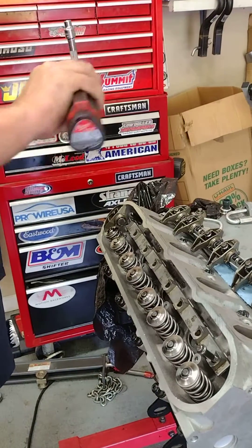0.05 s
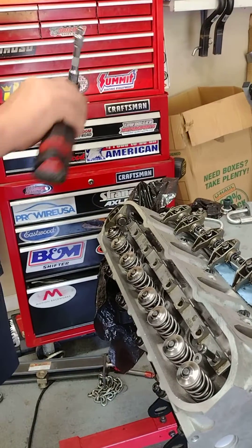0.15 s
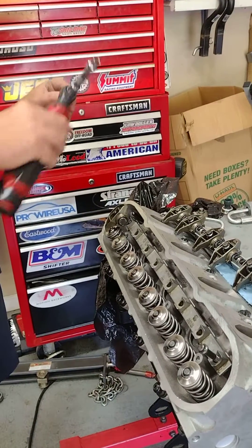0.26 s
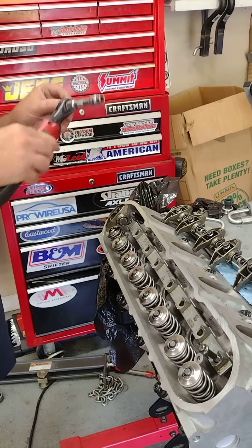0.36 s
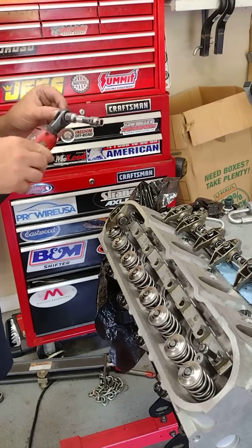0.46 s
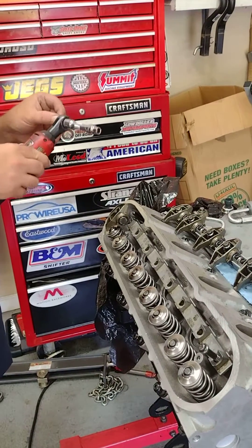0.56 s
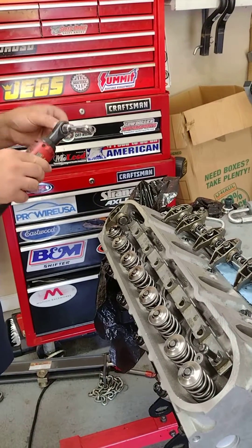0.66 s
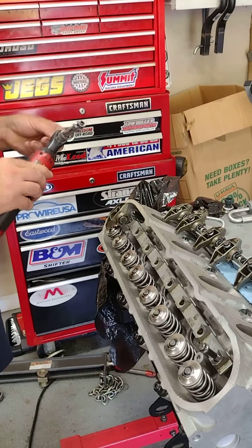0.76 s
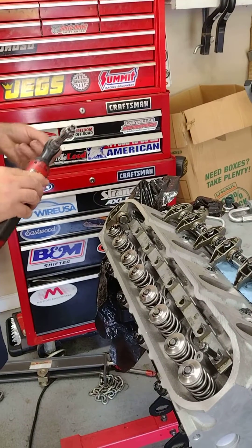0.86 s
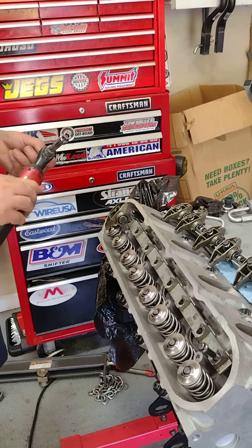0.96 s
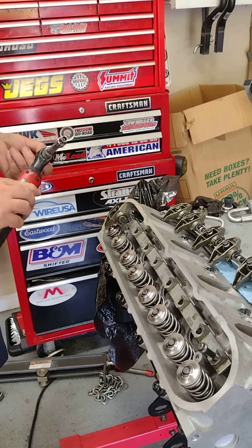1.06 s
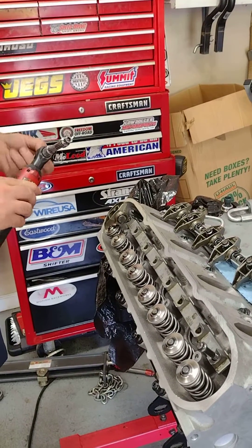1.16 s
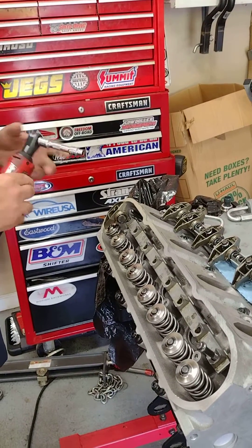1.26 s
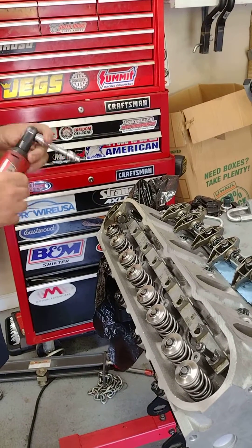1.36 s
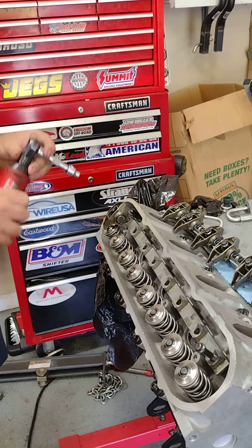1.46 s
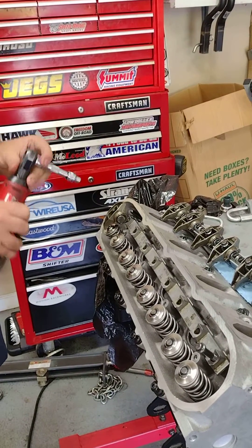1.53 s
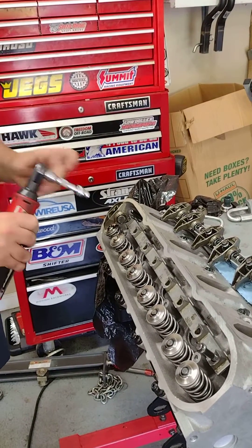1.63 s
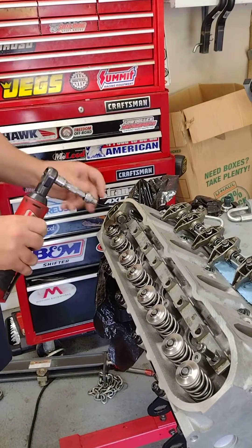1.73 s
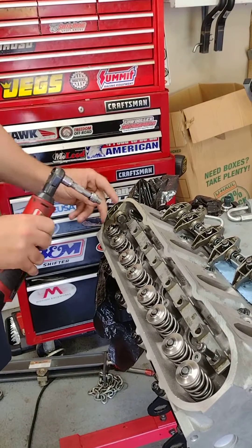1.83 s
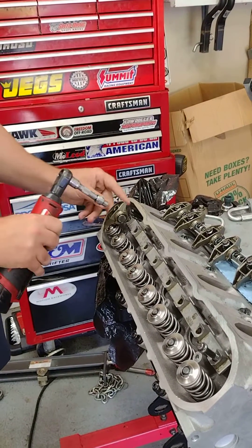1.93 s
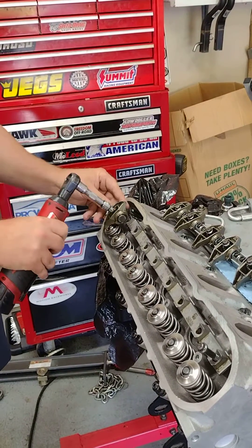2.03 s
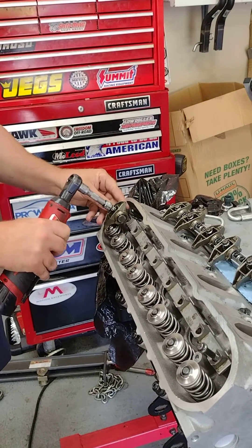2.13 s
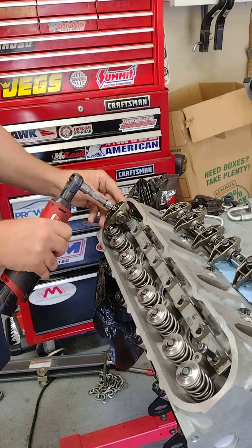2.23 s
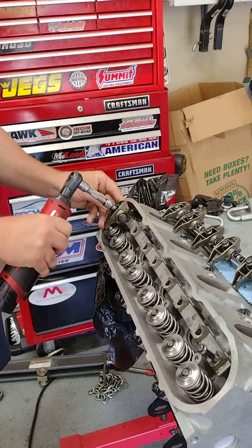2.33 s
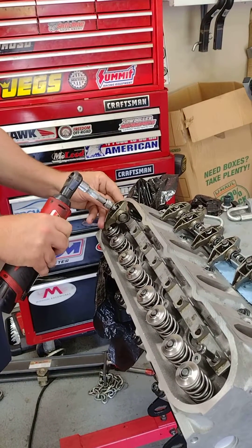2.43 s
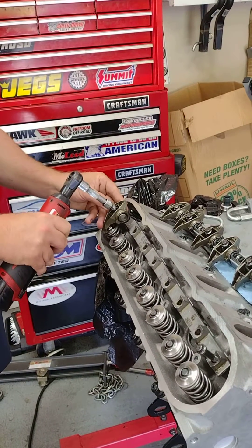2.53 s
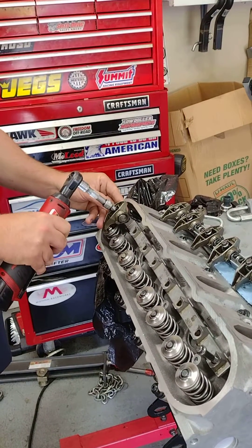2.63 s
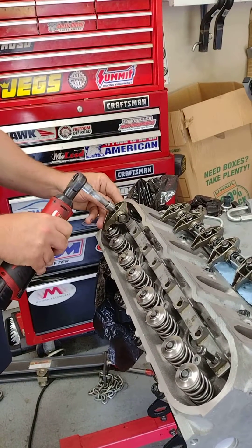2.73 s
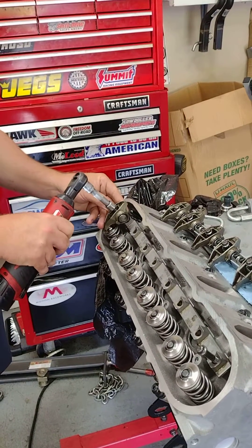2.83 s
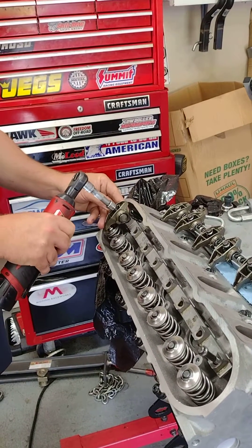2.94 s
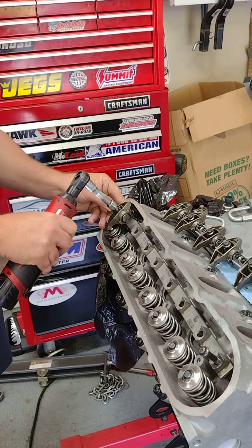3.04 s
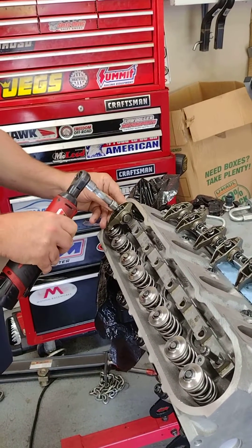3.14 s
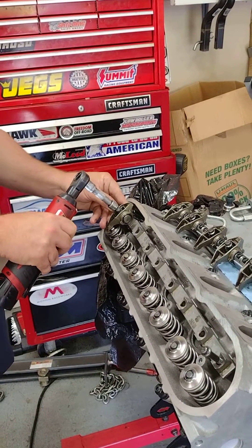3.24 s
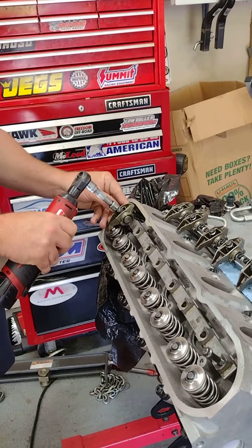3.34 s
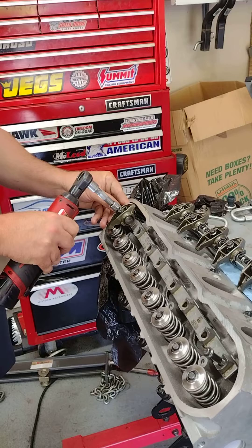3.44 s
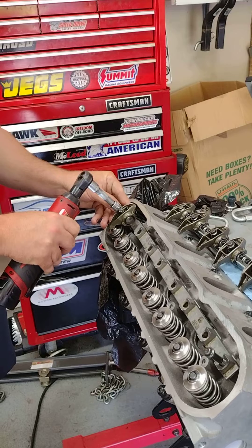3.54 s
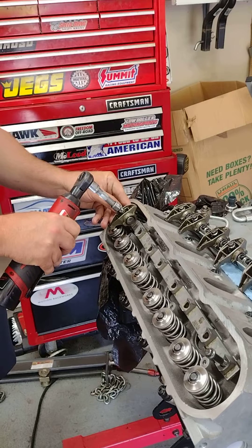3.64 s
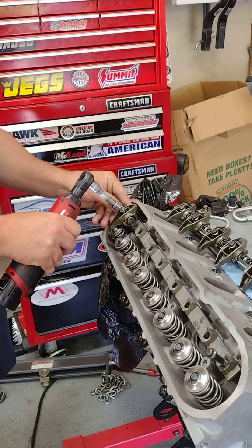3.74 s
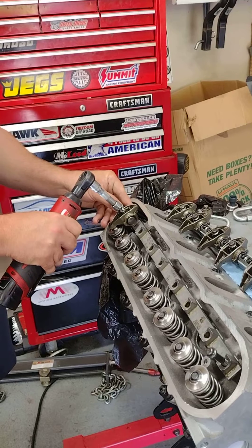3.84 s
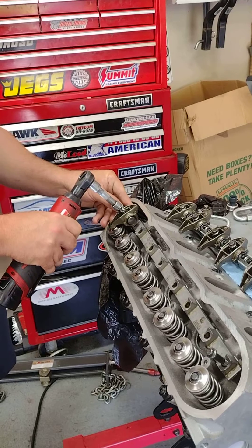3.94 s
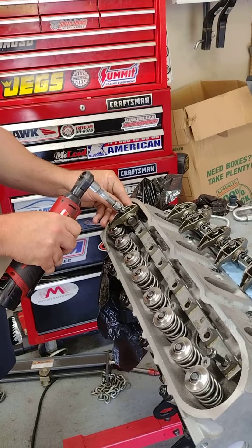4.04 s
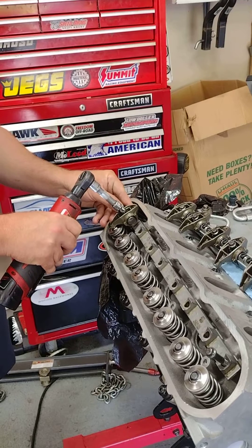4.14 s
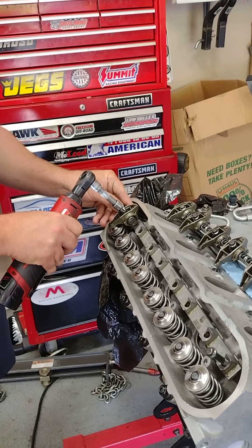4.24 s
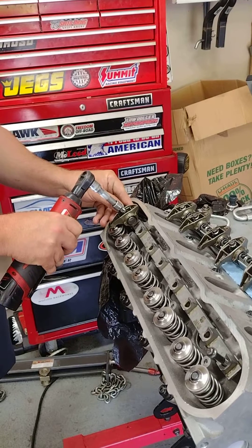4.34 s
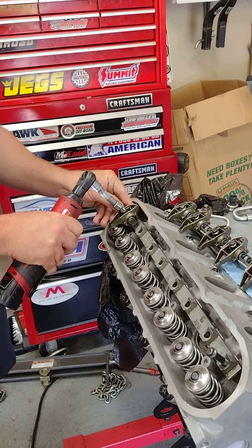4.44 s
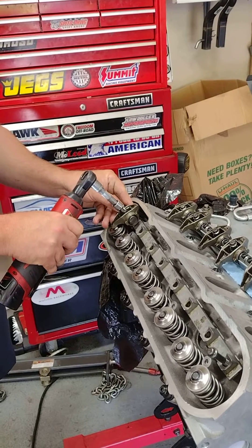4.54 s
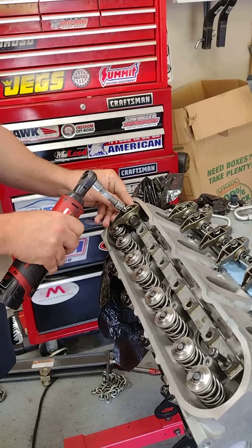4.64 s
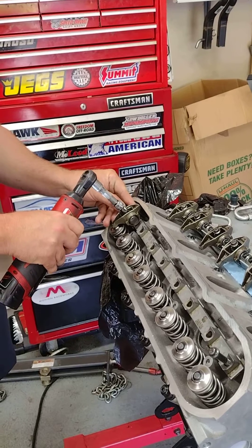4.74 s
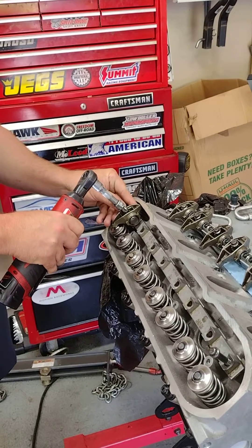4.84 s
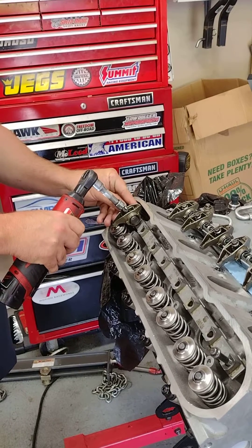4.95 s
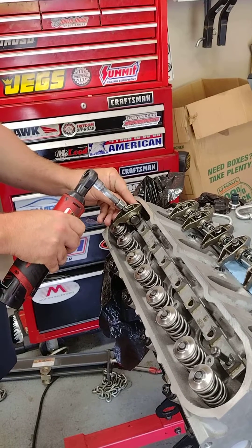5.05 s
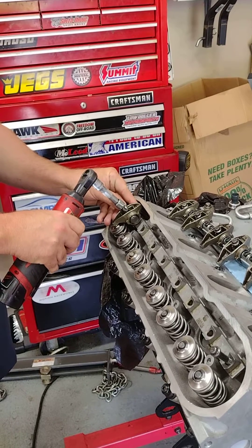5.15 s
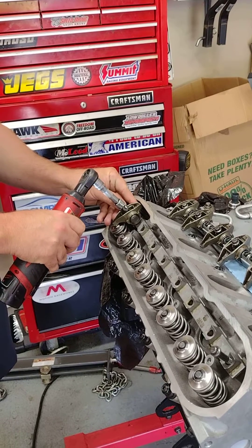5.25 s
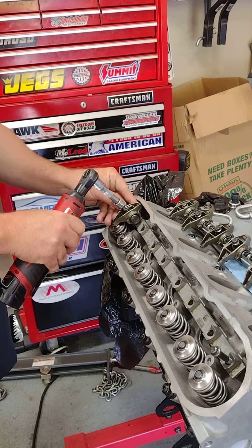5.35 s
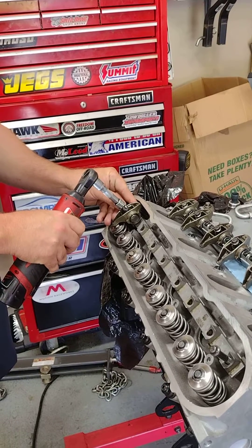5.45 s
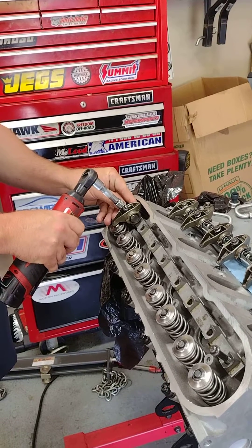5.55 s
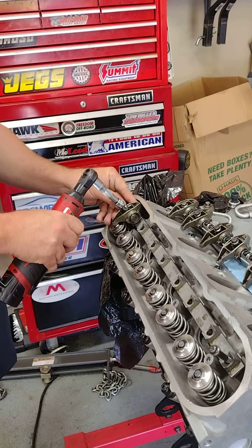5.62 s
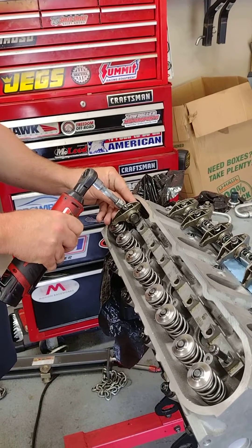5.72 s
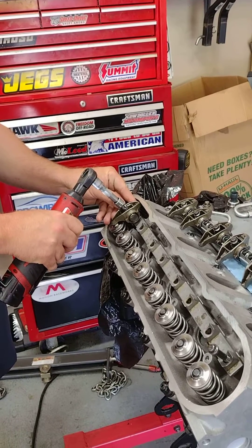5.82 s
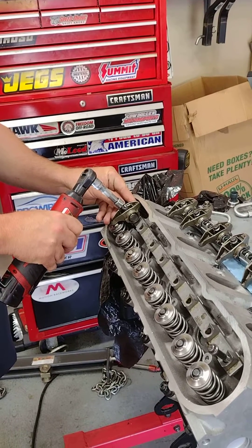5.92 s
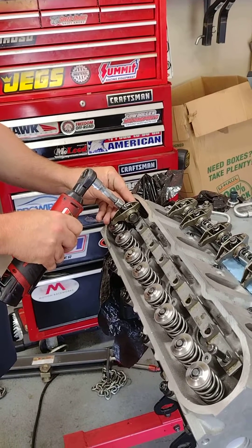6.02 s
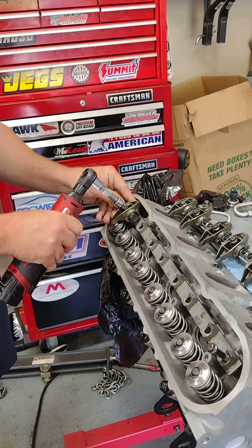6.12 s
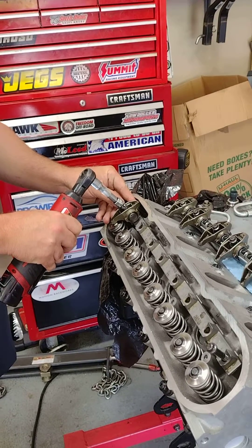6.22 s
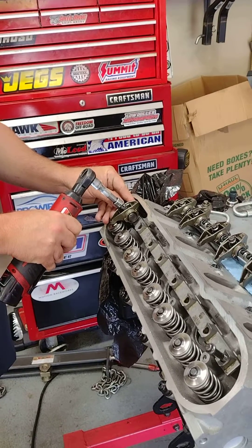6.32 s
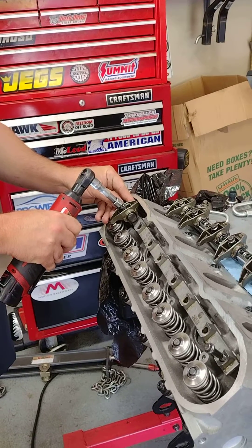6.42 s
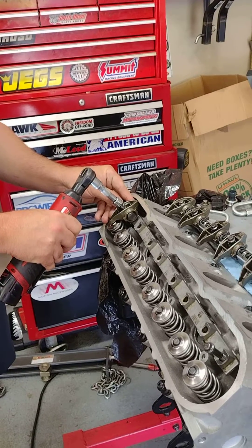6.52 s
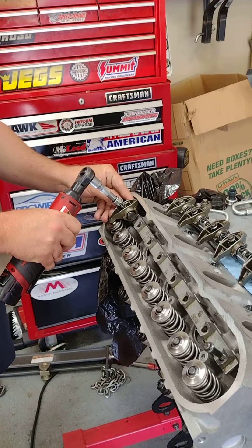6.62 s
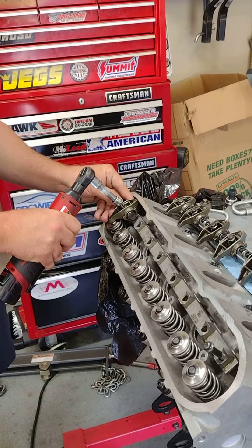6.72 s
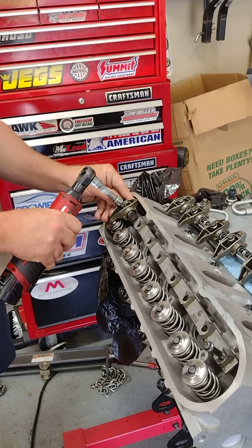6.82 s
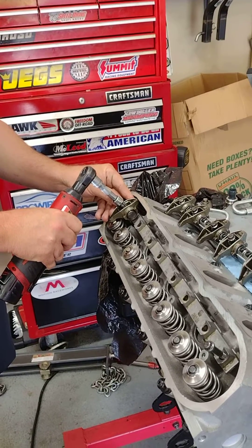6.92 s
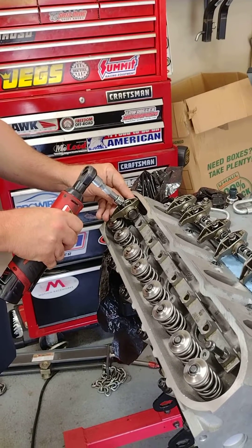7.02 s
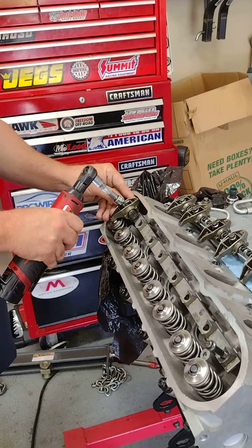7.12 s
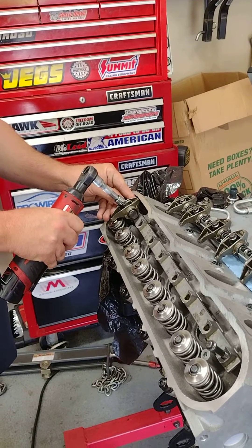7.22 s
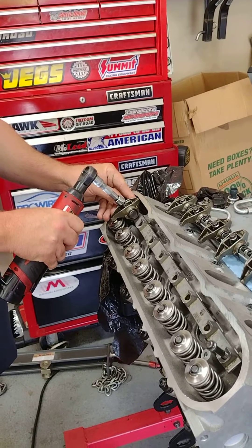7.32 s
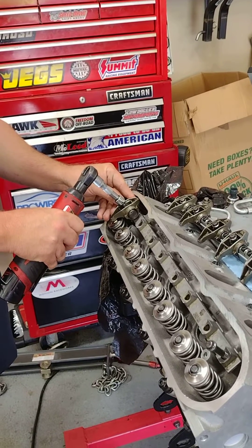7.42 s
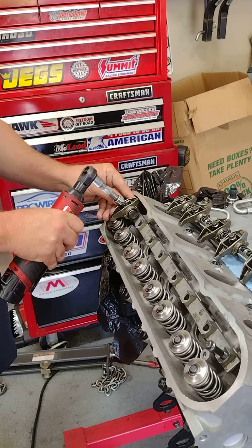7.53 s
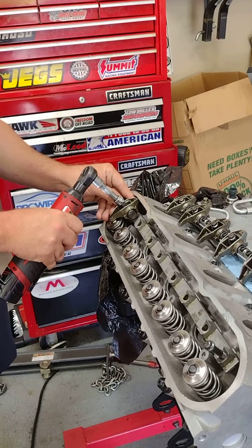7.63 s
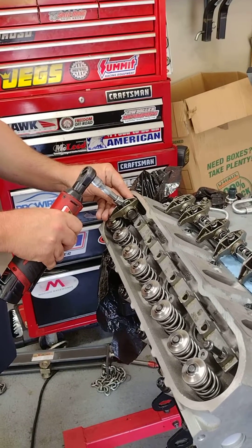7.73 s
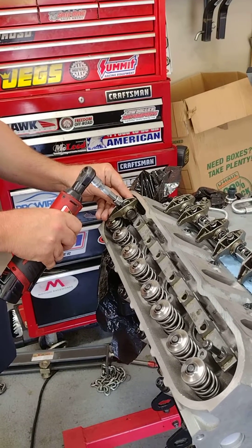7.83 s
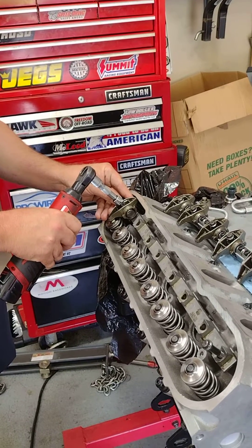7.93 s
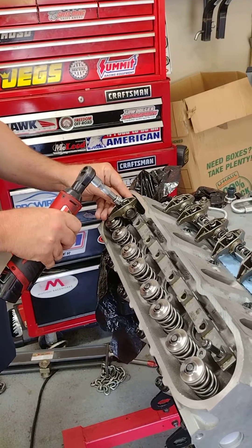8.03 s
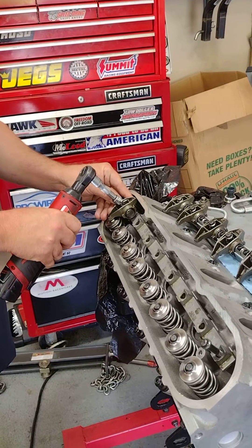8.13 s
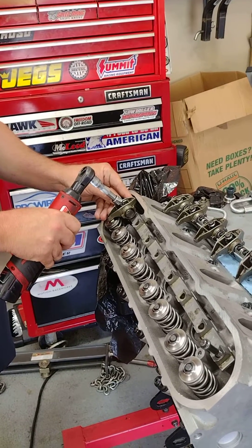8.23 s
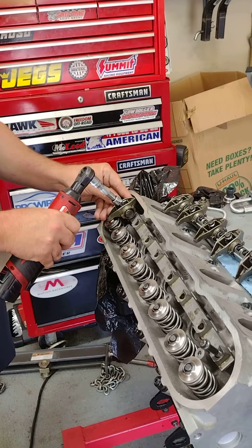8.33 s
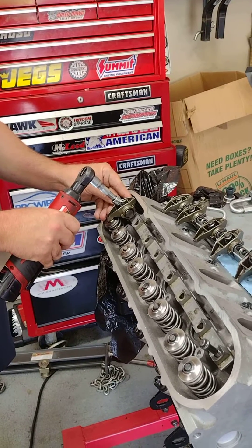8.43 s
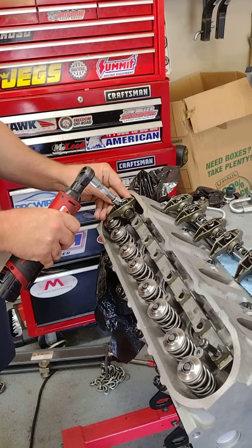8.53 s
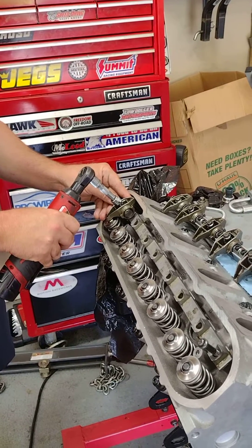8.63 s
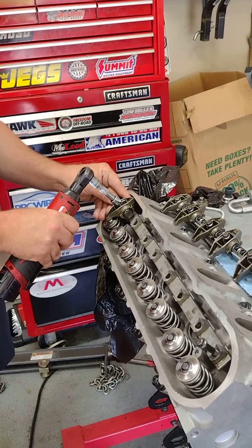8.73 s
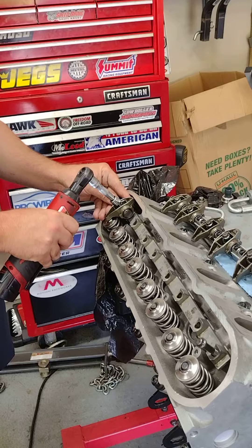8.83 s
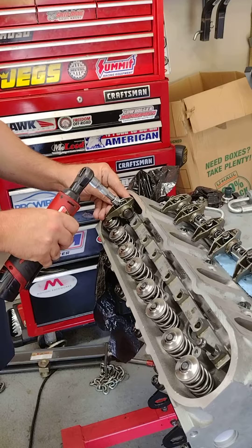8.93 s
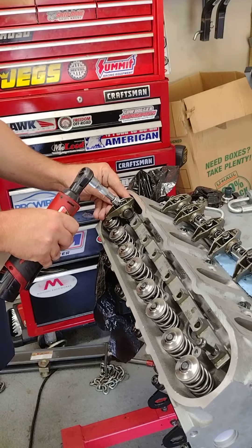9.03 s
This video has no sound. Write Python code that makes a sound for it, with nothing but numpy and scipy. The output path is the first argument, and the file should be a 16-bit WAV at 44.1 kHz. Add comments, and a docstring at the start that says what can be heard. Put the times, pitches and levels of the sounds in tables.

```python
"""A garage, close to a phone: hands turn a cordless ratchet over and seat its socket on a bolt in a cast engine head.
Then the motor runs: a crank rocks the yoke, the pawl skips over teeth, the yoke knocks at both ends of its swing
and the gears grind. Contacts are short pushes into resonances; grind, slides and air are coloured noise; the whine
and the far engine that swells towards the end are sines. The room hums faintly, and more while the tool runs."""
import sys
import numpy as np
from scipy import signal
from scipy.fft import rfft, irfft, next_fast_len
from scipy.io import wavfile
from scipy.ndimage import map_coordinates

SR = 44100
rng = np.random.default_rng(int(sys.argv[2]) if len(sys.argv) > 2 else 0)


def transcribe(signal):
    """Save signal, clipped to [-1, 1], as a 16-bit WAV file at the path in sys.argv[1]."""
    frames = np.atleast_2d(signal).T
    limited = np.clip(frames, -1, 1)
    pcm = np.round(limited * 32767).astype(np.int16)
    wavfile.write(sys.argv[1], SR, pcm)


def invert_db(x):
    """Field ratio 10**(x/20) for x, a level in decibels (scalar or array-like)."""
    u = np.asarray(x, float) / 20
    return 10 ** u


N = 399987
TIME = np.arange(N) / SR  # s

# crank speed: [t/s, speed/turns per s]
CRANK = [(2.7, 18.76), (2.77, 34.5), (2.86, 45.75), (3.05, 43.35), (3.37, 43.16), (3.81, 38.87),
         (4.2, 38.27), (4.46, 27.64), (4.67, 24.64), (5.09, 22.94), (5.69, 22.83), (5.89, 33.15),
         (6.06, 35.33), (6.37, 44.32), (6.86, 46.0), (7.42, 43.9), (7.85, 39.7), (9.07, 38.95)]
# one crank turn, pawl dropping over teeth on the back swing:
# [share of turn, relative level/dB, place ahead on the wheel/crank turns, scatter/turns]
TEETH = [(.065, 9, 0, .01), (.205, 10, -1, .01), (.34, -1, -1, .025), (.445, 1, -1, .02)]
# resonances of pawl, tool housing, light tick and engine casting: [f/Hz, width/Hz, relative level/dB]
PAWL = [(12620, 2170, -9), (16000, 470, -18)]
HOUSING = [(700, 43, -11), (1060, 85, -16), (2010, 360, 1.5), (2560, 420, 3), (3367, 680, 6),
           (5790, 1230, 1)]
TICK = [(1900, 890, -4.5), (3300, 1320, 2.5), (6150, 2200, -2), (11000, 1200, -12)]
CASTING = [(306, 65, -4), (433.3, 19, 7.5), (561, 13, 6.5), (680, 200, -3.5), (1020, 50, -4)]
# drift of the quiet room's hum, ahead of its flutter: [t/s, level/dB]
ROOM = [(.1, -64), (.5, -70.5), (1.3, -70.5), (2, -77.5), (2.6, -69.5)]


def unit(x):
    """Scaled to rms 1."""
    return x / np.sqrt(np.mean(x ** 2) + 1e-20)


def along(points, hz, column=1):
    """A table column read on a log-frequency axis."""
    rows = np.transpose(points)
    return np.interp(np.log(hz + 1), np.log(rows[0] + 1), rows[column])


def curves(rows):
    """One value per sample for each column after the time."""
    s, *cols = np.transpose(rows)
    return [np.interp(TIME, s, c) for c in cols]


def wobble(rate):
    """A smooth random curve, rate knots a second."""
    return map_coordinates(rng.standard_normal(int(N * rate / SR) + 4), [TIME * rate])


def filtered(x, response):
    """x times a complex response of frequency."""
    m = next_fast_len(N + SR // 2)
    return irfft(rfft(x, m) * response(np.fft.rfftfreq(m, 1 / SR)), m)[..., :N]


def ringing(x, modes):
    """x through causal band-pass resonances, summed with alternating sign."""
    def response(f):
        return sum((-1) ** k * invert_db(db) * 1j * f * width / (centre ** 2 - f * f + 1j * f * width)
                   for k, (centre, width, db) in enumerate(modes))
    return filtered(x, response)


def hiss(spectrum):
    """Coloured noise of rms 1."""
    return unit(filtered(rng.standard_normal(N), lambda hz: invert_db(along(spectrum, hz))))


def blows(times, db, chatter, t60):
    """Sharp pushes, each followed by a short noisy rattle (at most 50 ms)."""
    push = np.bincount(np.round(times * SR).astype(int), invert_db(db), N)[:N]
    fade = invert_db(-60 * TIME[:SR // 20] / t60)
    return push + chatter * signal.fftconvolve(push, fade)[:N] * rng.standard_normal(N)


def struck(times, peak_db, modes, chatter, t60):
    """Single contacts whose ring is scaled to start near the given peak."""
    peak = sum(invert_db(db) * width for _, width, db in modes) * 2 * np.pi / SR
    return ringing(blows(times, peak_db, chatter, t60), modes) / peak


def each_turn(turns, pattern, column, jitter, scatter_db):
    """Times and sizes of contacts that recur on every crank turn."""
    rows = np.array(pattern)
    luck = rng.standard_normal((2, int(turns[-1]) - 1, len(rows)))
    at = np.arange(luck.shape[1])[:, None] + rows[:, 0] + jitter * luck[0]
    db = rows[:, column] + scatter_db * luck[1]
    return np.interp(at, turns, TIME).ravel(), db.ravel()


def swell(start, rise, db, fall_db):
    """An even rise to a peak, then a steady fall in dB per second."""
    return np.clip((TIME - start) / rise, 0, 1) * invert_db(db - fall_db * np.maximum(TIME - start - rise, 0))


def crank():
    """Crank angle in turns, and how near full speed it runs (0-1)."""
    speed = curves(CRANK)[0]
    turns = np.cumsum(speed * (TIME > CRANK[0][0])) / SR
    return turns, np.clip((speed - 24) / 14, 0, 1)


def strength(db, db_per_speed):
    """Gain of a running part: louder with speed, growing after the trigger."""
    trigger_s, spin_up_s = 2.709, .14
    bite = .26  # the gears bite at this share of full strength, then grow evenly
    cruise = 40  # usual crank turns per s
    since = TIME - trigger_s
    onset = (since > 0) * np.clip(bite + (1 - bite) * since / spin_up_s, 0, 1)
    return onset * invert_db(db + db_per_speed * (curves(CRANK)[0] - cruise))


def gear_strength():
    """Gain of the gear train, which whine and stand hum follow: dB at the usual speed, dB per extra turn per s."""
    return strength(-28.5, 0.25)


def spread(spectrum):
    """Two noises placed around both ears: a common part, and a part of opposite sign on each side."""
    # left-right likeness of the room air, ahead of the uneven side weights: [f/Hz, likeness]
    alike = [(60, 0.92), (240, 0.66), (950, -0.26), (3770, -0.3), (15000, -0.31)]

    def shares(hz):
        angle = np.arccos(np.clip(along(alike, hz), -1, 1)) / 2
        return np.array([np.cos(angle), np.sin(angle)])
    noises = np.array([hiss(spectrum), hiss(spectrum)])
    return [[1, 0.64], [1, -0.83]] @ filtered(noises, shares)


def room_air():
    """Soft broadband air, drifting partly with the hum."""
    # colour of the air: [f/Hz, relative level/dB]
    air_colour = [(120, -34), (200, -8.5), (366, -5), (529, -8.5), (612, -8), (1230, -15.5), (3430, -21),
                  (11100, -26.5), (15100, -30), (16000, -31)]
    room_db, = curves(ROOM)
    follows = 0.29  # share of the hum's drift, dB per dB
    return invert_db(-72.5 + follows * (room_db - room_db[-1])) * spread(air_colour)


def stand_hum():
    """Low noise and a narrow 135 Hz resonance; it grows as the tool shakes the engine stand and the far engine swells."""
    # colour of the hum: [f/Hz, relative level/dB]
    stand_colour = [(15, -51), (25, -18), (43, -14.5), (129, 2), (145, 1), (168, -6.5), (230, -21),
                    (300, -59), (510, -120)]
    room_db, = curves(ROOM)
    shake = invert_db(-36) * gear_strength()
    rumble = invert_db(-5) * engine_swells()
    level = np.sqrt(invert_db(room_db) ** 2 + shake ** 2 + rumble ** 2) * invert_db(1.7 * wobble(5.4))
    resonance = unit(ringing(rng.standard_normal(N), [(135.0, 5.8, 0)]))
    return level * (spread(stand_colour) + invert_db(-9.0) * resonance)


def handling():
    """Socket and pawl click, the housing or, once seated, the casting answers low; a palm slides on the grip."""
    # contacts, peaks ahead of the mix: [t/s, tick level/dB, low answer level/dB, pawl level/dB, socket level/dB]
    touches = [(1.102, -70, -58, -65, -75), (1.1162, -34.5, -52, -27.5, -44), (1.2994, -69, -78, -70, -72),
               (1.485, -58, -68, -85, -74), (1.552, -45, -73, -74, -54.5), (2.1304, -41, -51, -49, -69),
               (2.204, -47, -45, -76, -57), (2.395, -75, -59, -82, -80), (2.4385, -50, -59, -60, -52),
               (2.4425, -34.5, -44, -48, -33), (2.62, -59, -70, -80, -46), (2.691, -61, -68, -80, -51),
               (2.7, -58, -72, -80, -44), (2.7097, -32, -60, -30, -54)]
    # resonances of the socket: [f/Hz, width/Hz, relative level/dB]
    socket_modes = [(1740, 200, -13), (2530, 120, -11), (3150, 50, 6), (4900, 200, -18), (5600, 300, -20)]
    # narrow resonances of the head, which rings on when not gripped: [f/Hz, width/Hz, relative level/dB]
    loose_modes = [(11700, 16, -10), (12540, 9.6, -5), (12520, 6.6, -2), (13000, 14, 0), (14060, 12, -11)]
    # a hand slides on the grip, ahead of the mix: [t/s, peak level/dB, rise/s, t60/s]
    slides = [(.422, -65, 0.02, 2.5), (.563, -49, 0.038, 0.18), (2.13, -66.5, 0.028, 0.53)]
    # colour of the rubbing: [f/Hz, relative level/dB]
    rub_colour = [(120, -38), (200, -1), (289, -8), (328, -12), (465, -0.5), (806, -11), (1980, -5.5),
                  (3500, -5.5), (5840, -10), (6880, -19), (16000, -19)]
    seated_s = 2  # from here on the socket touches the bolt

    s, tick_db, low_db, pawl_db, socket_db = np.transpose(touches)
    seated = s > seated_s
    tick = struck(s, tick_db, TICK, chatter=.9, t60=.02)
    casting = struck(s[seated], low_db[seated], CASTING, chatter=0.089, t60=0.056)
    housing = struck(s[~seated], low_db[~seated], HOUSING[:2], chatter=0.11, t60=0.037)
    pawl = struck(s, pawl_db, PAWL, chatter=0.36, t60=0.05)
    loose = struck(s, pawl_db - 0.5, loose_modes, chatter=0.14, t60=0.03)
    pawl[:seated_s * SR] += loose[:seated_s * SR]
    socket = struck(s, socket_db, socket_modes, chatter=0.17, t60=0.029)
    strokes = sum(swell(at, rise, db, 60 / t60) for at, db, rise, t60 in slides)
    slide = strokes * invert_db(1.3 * wobble(150)) * hiss(rub_colour)
    return tick + casting + pawl + socket + housing + slide


def wheel_db(strokes):
    """dB of each regular pawl drop by where it lands on the ratchet wheel, which runs out of true."""
    # one round of the wheel: [place/crank turns, drop level/dB, extra level on every other stroke/dB]
    runout = [(0, -4.5, 4.5), (5, -2.5, 2), (7, -9.5, 2.5), (8.5, -10.5, -2), (10.5, -6.5, 1),
              (15, -4.5, 4.5), (17, -4.5, 0.5), (20, 4.5, 2.5)]
    wheel_turns = 20  # crank turns for one turn of the wheel
    place = (np.arange(strokes)[:, None] + np.array(TEETH)[:, 2]).ravel() % wheel_turns
    at, drop_db, alternate_db = np.transpose(runout)
    return np.interp(place, at, drop_db) + (-1) ** place * np.interp(place, at, alternate_db)


def pawl_drops(turns):
    """The pawl falls off teeth by crank angle, or at listed times when slow, ringing itself and the head."""
    # slow strokes, one by one: the same pair of hard drops, further apart in time as the crank slows:
    # [t/s, first drop level/dB, gap to the second/ms, second drop level/dB], levels relative
    slow_strokes = [(4.1013, 5.5, 2.7, 4.9), (4.1262, 5.9, 3.9, 10.2), (4.1531, 12.6, 3.7, 9.2),
                    (4.1791, 15.2, 3.8, 10.6), (4.2054, 13.7, 4.1, 6.4), (4.232, 8.6, 4.2, 8.2),
                    (4.2591, 8.9, 4.3, 11.6), (4.2869, 10.6, 4.4, 9.3), (4.3158, 8.6, 4.3, 5.7),
                    (4.347, 0.6, 5.2, 5.7), (4.3789, 4.1, 5.6, 6.2), (4.4125, 3.7, 5.3, 10.2),
                    (4.4469, 6.0, 4.2, 3.5), (4.4824, 7.0, 5.2, 5.6), (4.5196, 9.2, 6.1, 8.2),
                    (4.5564, 2.6, 7.1, 6.7), (4.5959, 7.3, 6.9, 8.0), (4.6354, 10.4, 6.4, 10.6),
                    (4.6755, 12.6, 6.4, 14.7), (4.7161, 7.2, 6.0, 6.0), (4.7576, 7.6, 6.6, 8.0),
                    (4.7975, 5.4, 6.6, 5.6), (4.8392, 9.3, 7.3, 11.8), (4.8813, 6.8, 7.3, 10.6),
                    (4.9237, -0.2, 7.1, 9.4), (4.9674, 3.2, 6.8, 7.5), (5.0093, -0.4, 6.6, 7.2),
                    (5.0528, 3.8, 6.2, 7.7), (5.0956, 6.0, 6.8, 6.5), (5.1399, 0.1, 5.4, 3.9),
                    (5.1832, -0.3, 7.3, 4.9), (5.2269, 6.0, 7.2, 8.4), (5.2707, 5.0, 6.4, 8.6),
                    (5.3144, 7.7, 6.7, 9.7), (5.3581, 7.6, 6.9, 9.1), (5.4022, 2.4, 7.4, 3.9),
                    (5.4454, 5.2, 8.1, 3.4), (5.4888, 10.1, 6.9, 10.6), (5.5319, 13.0, 7.1, 10.4),
                    (5.575, 7.1, 7.5, 8.0), (5.6202, 9.2, 7.6, 10.4), (5.6636, 5.7, 6.8, 5.7),
                    (5.7072, 11.2, 6.7, 14.9), (5.747, 7.2, 6.6, 13.5), (5.7845, 7.1, 5.7, 9.1),
                    (5.818, 2.1, 6.7, 8.1), (5.8513, 6.3, 6.0, 12.0), (5.883, 5.1, 4.6, 11.8),
                    (5.9135, 5.3, 4.1, 7.1)]
    # resonance of the head: [f/Hz, width/Hz, relative level/dB]
    head_modes = [(12850, 650, 0)]
    second_stroke_s = 2.72  # the drop at 2.71 s is among the contacts; the regular drops follow from here

    times, db = each_turn(turns, TEETH, column=1, jitter=np.array(TEETH)[:, 3], scatter_db=2)
    db = db + wheel_db(len(db) // len(TEETH))
    s, first_db, gap_ms, second_db = np.transpose(slow_strokes)
    # the slow pairs stand in for the two hard drops of each turn
    hard = np.arange(len(db)) % len(TEETH) < 2
    slow = (times > s[0] - .008) & (times < s[-1] + .012)
    regular = (times > second_stroke_s) & ~(hard & slow)
    times = np.r_[times[regular], s, s + gap_ms / 1000]
    db = np.r_[db[regular], first_db, second_db]
    drops = blows(times, db, chatter=.5, t60=.011)
    spring = unit(ringing(drops, PAWL))
    # the pawl's ring builds up again in the head around it, which rounds the attack
    head = unit(ringing(spring, head_modes))
    return head + invert_db(-1.5) * spring + invert_db(-14.5) * unit(ringing(drops, TICK))


def yoke_knocks(turns, fast):
    """The yoke takes up its play on every turn, knocking housing and casting and ringing the anvil."""
    # one crank turn: [share of turn, housing knock level/dB, anvil ring level/dB], levels relative
    knocks = [(.47, 2.5, -6), (.92, -10.5, 3.5), (.22, -10, -5.5)]
    # resonance of the anvil: [f/Hz, width/Hz, relative level/dB]
    anvil_modes = [(7364, 160, 0)]
    stops = blows(*each_turn(turns, knocks, column=1, jitter=.015, scatter_db=2), chatter=0.33, t60=0.015)
    knock = unit(ringing(stops, HOUSING)) + invert_db(-24.0) * unit(ringing(stops, CASTING))
    taps = blows(*each_turn(turns, knocks, column=2, jitter=0.018, scatter_db=4.5), chatter=0.15, t60=0.006)
    anvil = unit(ringing(taps, anvil_modes))
    return invert_db(-4.5) * knock + invert_db(-16 + 5.25 * fast) * anvil


def gear_grind(turns, fast):
    """Meshing gears as noise, brighter with speed and surging once per crank turn."""
    # colours of the mesh, at speed and slow: [f/Hz, relative level/dB]
    fast_colour = [(120, -39), (200, -20.5), (530, -17.5), (640, -3.5), (800, -3), (900, -11), (1030, -5),
                   (1500, -8), (2100, -5), (3480, 0), (4580, -3.5), (5400, -0.5), (8500, -5), (11200, -1),
                   (15900, -3), (17000, -60)]
    slow_colour = [(120, -58), (200, -20), (538, -16), (646, -4), (931, -8.5), (1020, -3.5), (1550, -13),
                   (2080, -9.5), (3420, -17), (8080, -19), (11400, -6.5), (15900, -3), (17000, -60)]
    mesh = np.sqrt(fast) * hiss(fast_colour) + invert_db(-6.5) * np.sqrt(1 - fast) * hiss(slow_colour)
    # the teeth are loaded for half of each turn
    load_db = (4.5 - 2.66 * fast) * np.cos(2 * np.pi * (turns - .35))
    grit_db = 2.41 * wobble(400) + 2.3 * wobble(60)  # uneven contacts
    return mesh * invert_db(load_db + grit_db)


def ratchet():
    """Gears and knocks follow the crank angle; pawl drops do too, except slow strokes at listed times."""
    turns, fast = crank()
    train = invert_db(-0.5) * gear_grind(turns, fast) + yoke_knocks(turns, fast)
    pawl_gain = strength(-31, 0.09)  # dB at the usual speed, dB per extra turn per s
    return gear_strength() * train + pawl_gain * pawl_drops(turns)


def motor():
    """A thin whine that glides with the crank speed and comes and goes."""
    # the whine comes and goes: [t/s, level re the gear gain/dB], ahead of its flutter and lean
    whine = [(2.8, -40), (2.86, -26), (3.4, -28), (3.5, -40), (3.62, -36), (3.68, -26), (3.9, -28),
             (4.0, -40), (4.3, -55), (6.2, -55), (6.38, -26), (7.0, -23), (7.55, -27), (7.68, -40),
             (7.78, -26), (9.07, -27)]
    whine_order = 13.14  # whine as a multiple of crank speed
    turns, _ = crank()
    level = gear_strength() * invert_db(curves(whine)[0] + 1.5 * wobble(7))
    return level * np.sin(2 * np.pi * whine_order * turns + .3 * wobble(12))


def engine_swells():
    """Level of the far engine: the loudest of its overlapping swells."""
    # [start t/s, rise/s, peak level/dB, fall/dB per s], ahead of the drone's flutter
    swells = [(6.3, .5, -53.5, 5), (7.3, 0.34, -55.5, 16), (8.52, 0.1, -49.5, 14)]
    return np.max([swell(*row) for row in swells], axis=0)


def far_engine():
    """A low sine of gliding pitch, unsteady in level and phase."""
    # pitch of the drone: [t/s, f/Hz]
    engine_pitch = [(6.4, 77), (6.81, 84.7), (8.45, 87.6), (9.05, 76.2)]
    hz, = curves(engine_pitch)
    phase = 2 * np.pi * np.cumsum(hz) / SR + 0.87 * wobble(8.3)
    return engine_swells() * invert_db(4.3 * wobble(3.7)) * np.sin(phase)


def garage(x, to_walls, size=8192):
    """Near sound leaning by frequency, plus a noise tail whose decay time depends on frequency."""
    # lean of the near sound: [f/Hz, left over right level/dB]
    lean = [(60, 0.0), (110, 12), (200, -2), (380, -1.5), (700, 3.5), (1290, 5), (2380, -15), (4400, -9.5),
            (8120, 8), (15000, 4.5)]
    # the tail: [f/Hz, t60/s, relative level/dB]
    tail_table = [(200, 0.28, -6), (820, 0.77, 3), (3060, 0.66, 3.5), (8400, 0.56, 1), (12100, 0.1, -1.33)]
    lead_s = .00014  # the tool is nearer the left port
    side = np.array([[1], [-1]])
    near = filtered(x, lambda hz: invert_db(side * along(lean, hz) / 2) * np.exp(1j * np.pi * hz * side * lead_s))
    # each short stretch gets its own noise tail, so the reverberation stays smooth
    starts = np.arange(0, N + size, size)
    hz, t, z = signal.stft(rng.standard_normal((len(starts), 2, SR // 3)), SR, nperseg=256)
    t60 = along(tail_table, hz)[:, None]
    decay = invert_db(along(tail_table, hz, column=2)[:, None] - 60 * t / t60)
    # dividing by the tail's energy keeps its level apart from its length
    z = z * decay / np.sqrt(t60 * SR / (6 * np.log(10)))
    tails = signal.istft(z, SR, nperseg=256)[1]
    padded = np.pad(to_walls, (size + 200, 3 * size))  # the tail starts 200 samples late
    window = np.sin(np.pi * np.arange(2 * size) / (2 * size))
    pieces = padded[starts[:, None] + np.arange(2 * size)] * window
    echoes = signal.fftconvolve(pieces[:, None], tails, axes=2)
    where = (starts[:, None] + np.arange(echoes.shape[2])).ravel()
    tail = [np.bincount(where, echoes[:, ear].ravel())[size:size + N] for ear in range(2)]
    return near + np.array(tail)


def scene():
    """Tool and hands in the room, over air, hum and far engine."""
    background = room_air() + stand_hum() + far_engine()
    hands, tool = handling(), ratchet()
    # light contacts are shielded by the palms and stir the room less than the running tool
    room = garage(tool + hands, tool + invert_db(-4.0) * hands)
    whine = motor() * invert_db([[1.5], [-1.5]])  # leans left
    return invert_db(-3) * room + whine + background


def low_pass(x):
    """Removes everything above the highest recorded frequency."""
    return signal.sosfilt(signal.butter(12, 17010, fs=SR, output="sos"), x)


def record(dry):
    """The phone rounds off the tallest peaks and keeps little above its band limit."""
    top_hz = 15950
    rounded = dry / (1 + np.abs(dry / .75) ** 3) ** (1 / 3)
    kept = filtered(rounded, lambda hz: np.where(hz < top_hz, 1, invert_db(-51)))
    return low_pass(kept)


dry = scene()
out = record(dry)
transcribe(out)
```